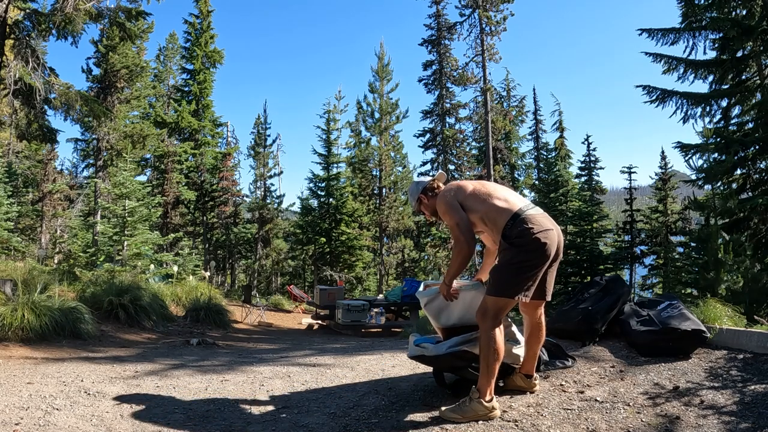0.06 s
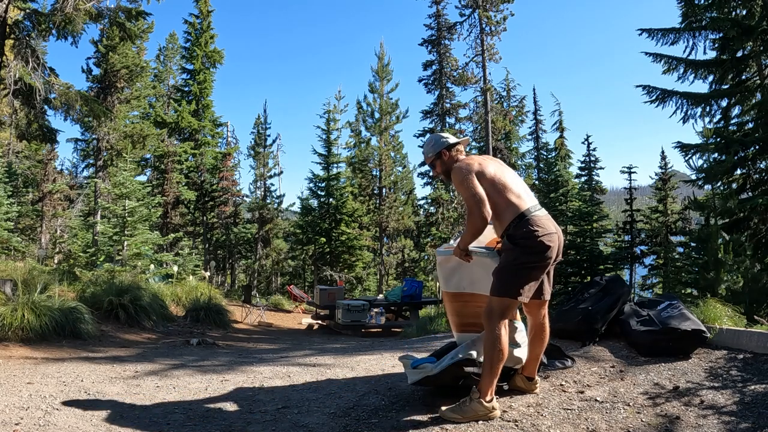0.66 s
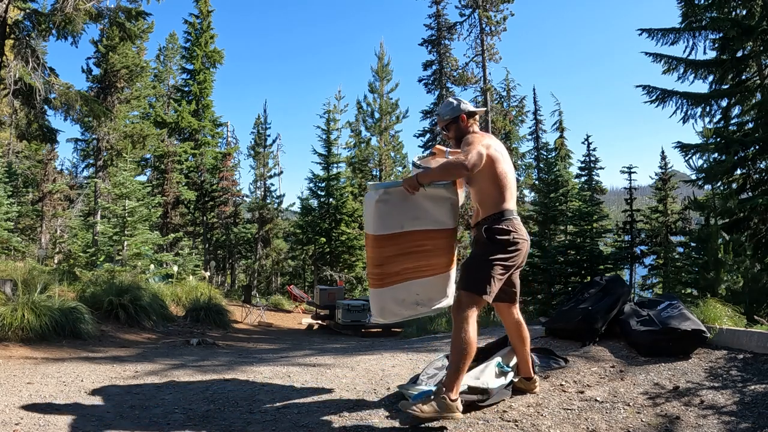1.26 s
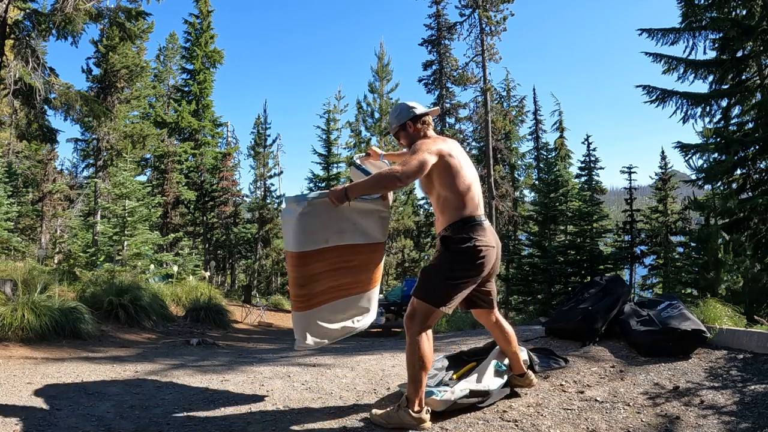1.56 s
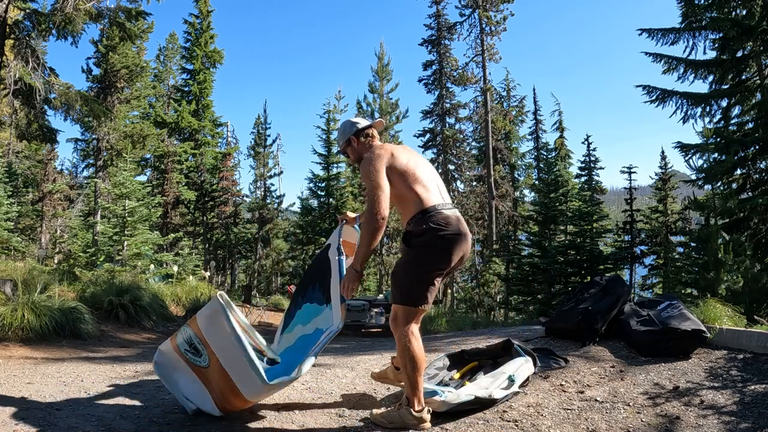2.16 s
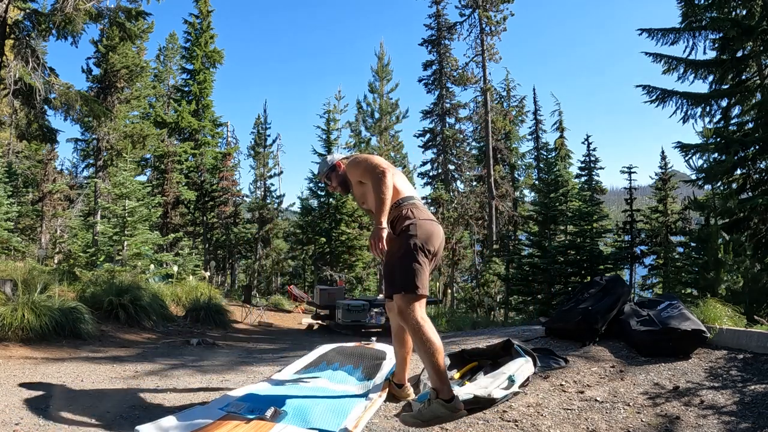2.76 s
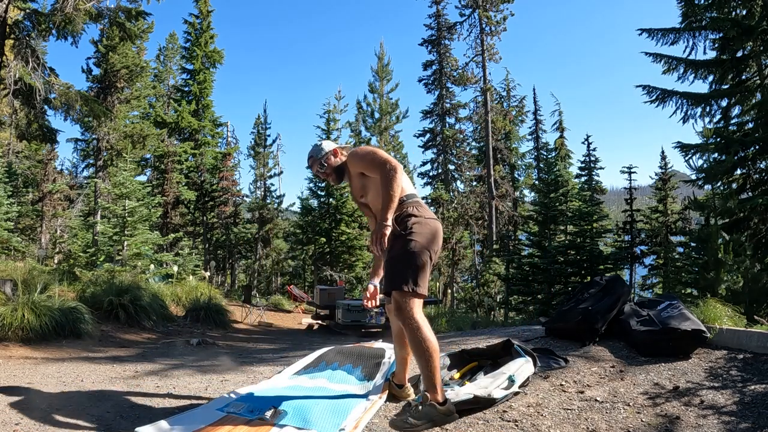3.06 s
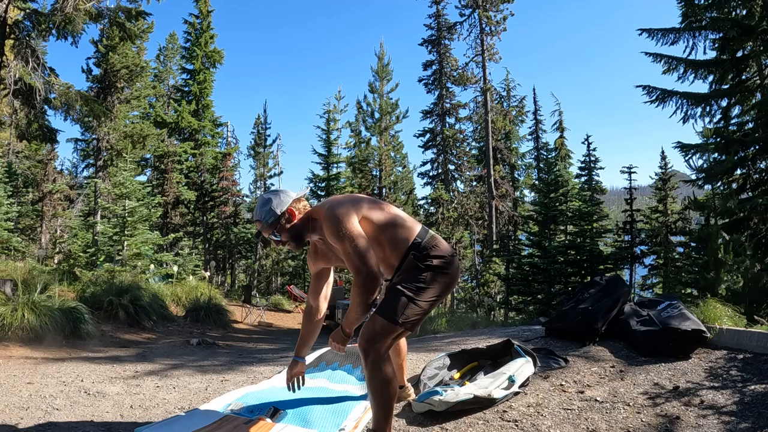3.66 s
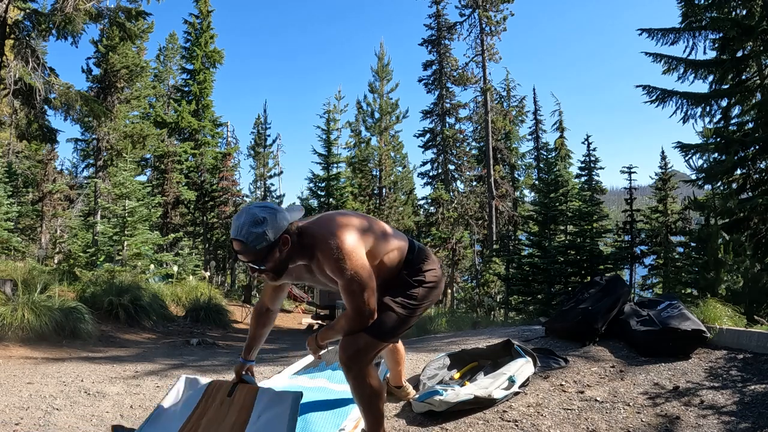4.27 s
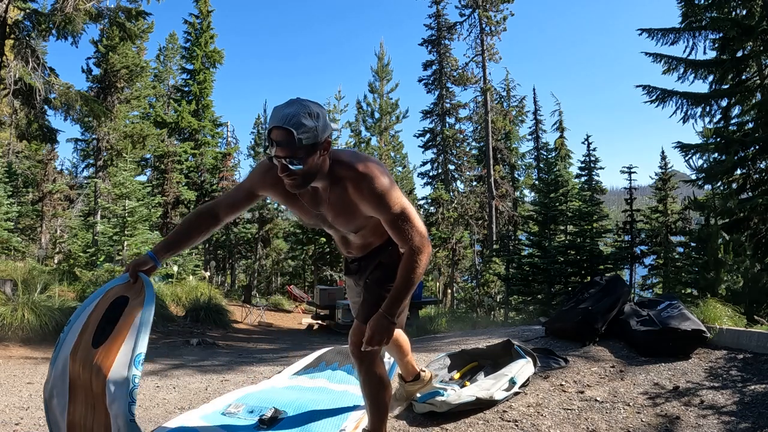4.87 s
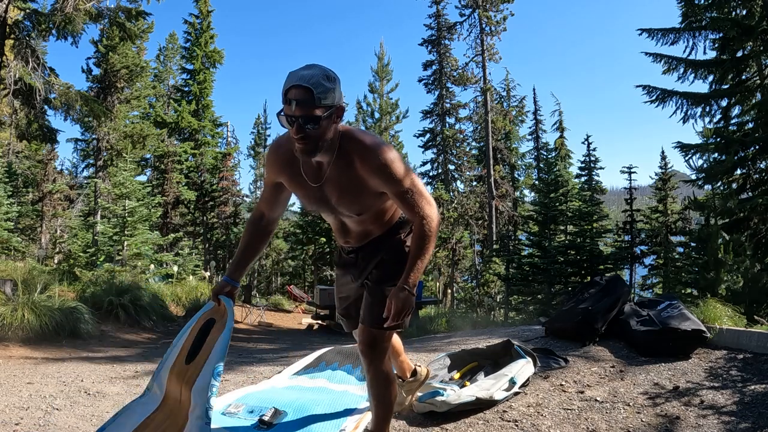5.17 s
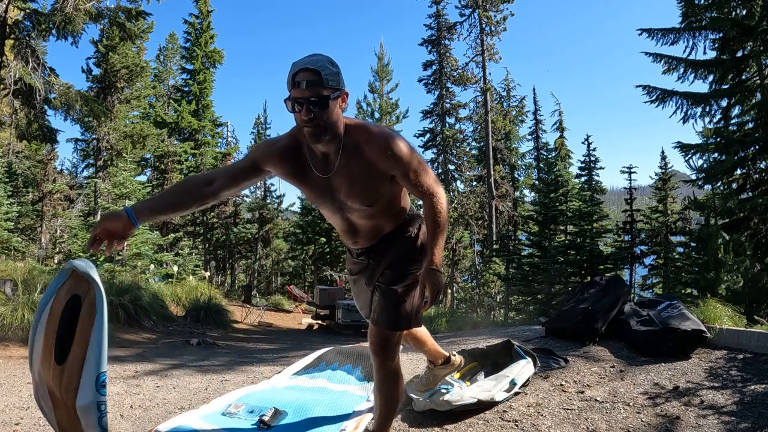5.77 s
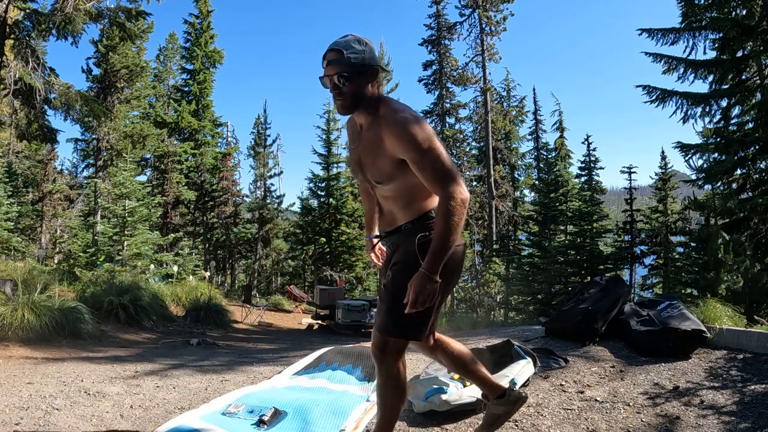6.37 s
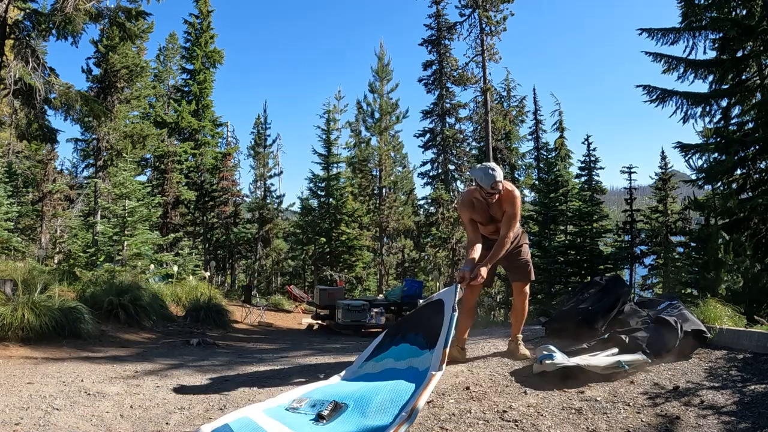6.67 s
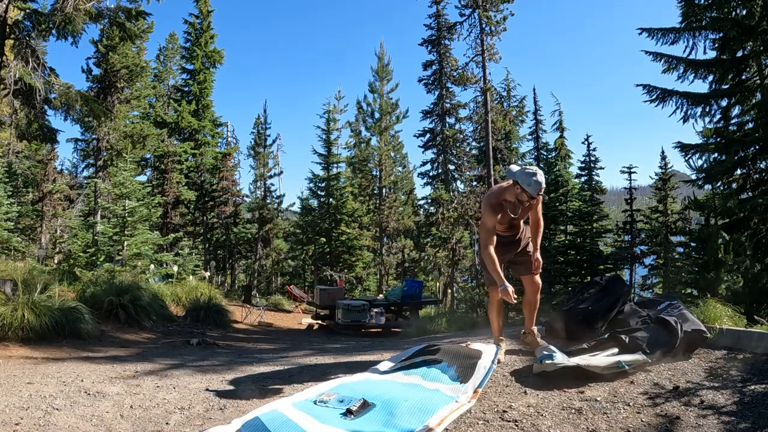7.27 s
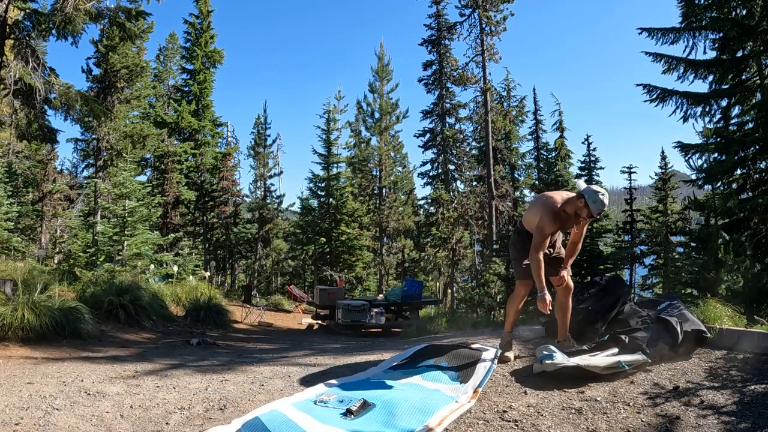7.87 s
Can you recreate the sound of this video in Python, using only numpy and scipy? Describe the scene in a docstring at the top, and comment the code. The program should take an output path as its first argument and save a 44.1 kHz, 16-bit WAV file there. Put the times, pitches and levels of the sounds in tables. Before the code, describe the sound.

A deflated vinyl paddleboard is handled close by on gravel, over faint forest air and a barely audible distant motor. Soft rubbing and a sharp click at 0.6 seconds lead to a loud, hollow slap at 0.9, followed by light knocks and a gritty slide. From 2.1 seconds the sheet snaps, scrapes and flops down fold by fold. The heaviest thump, at 2.6, pushes out a low puff of air and briefly overloads the microphone; smaller ones follow until 3. A knock comes at 3.5, then shoes scuff and pebbles tick. Around 4.8 a brief creak precedes another slap. Lighter knocks and rustling continue to a hard crack and thump near 6.2. From 6.6 to 7.1 the board is dragged over the stones with a rumbling scrape. It thuds down at 7.25, and small scuffs, ticks and a soft bump finish around 8.

```python
"""A deflated paddleboard is pulled from its bag and unrolled on a gravel clearing. Its stiff vinyl
slides, flops down fold by fold on cushions of trapped air and is dragged straight. Friction sounds
as a stream of tiny impacts under the sheet and the scuffing shoes; pebbles and creases tick.
A far motor drones under the still forest air. The hardest slaps overload the microphone."""
import sys
import numpy as np
from scipy import signal
from scipy.fft import rfft, irfft, next_fast_len
from scipy.io import wavfile
from scipy.ndimage import map_coordinates

SR = 44100
rng = np.random.default_rng(int(sys.argv[2]) if len(sys.argv) > 2 else 0)


def generate_wav(sig):
    """Save sig (samples, or channels by samples) to the path in sys.argv[1] as 16-bit PCM at SR."""
    pcm = np.round(np.clip(np.atleast_2d(sig).T, -1, 1) * 32767).astype(np.int16)
    wavfile.write(sys.argv[1], SR, pcm)


N = 358533


def amp(db):
    """Decibels to amplitude ratio."""
    return 10 ** (np.asarray(db) / 20)


def unit(x):
    """Normalisation to rms 1."""
    return x / np.sqrt(np.mean(x ** 2) + 1e-20)


def along(points, hz):
    """Interpolation of (Hz, value) points on a logarithmic frequency axis."""
    f, v = np.transpose(points)
    return np.interp(np.log(hz + 1), np.log(f), v)


def curve(points, outside=None):
    """Linear interpolation of (seconds, value) points at every sample."""
    return np.interp(np.arange(N) / SR, *np.transpose(points), left=outside, right=outside)


def wobble(rate):
    """Smooth random modulation, with rate knots a second."""
    return map_coordinates(rng.standard_normal(int(N * rate / SR) + 4), [np.arange(N) * rate / SR])


def swell(centre, length):
    """Gaussian envelope; length is its width in seconds at 1/e of the peak."""
    return np.exp(-np.minimum((2 * (np.arange(N) / SR - centre) / length) ** 2, 20))


def stroke(start, rise, hold, release):
    """Exponential envelope: it climbs 20 dB over the rise, holds, then loses 20 dB per release time."""
    t = np.arange(N) / SR - start
    decades_down = np.maximum(1 - t / rise, 0) + np.maximum(t - rise - hold, 0) / release
    return amp(-20 * np.minimum(decades_down, 10))


def filtered(x, response):
    """Filtering by multiplication in the frequency domain."""
    n = x.shape[-1]
    m = next_fast_len(n + 4096)
    return irfft(rfft(x, m) * response(np.fft.rfftfreq(m, 1 / SR)), m)[..., :n]


def coloured(x, spectrum, size=4096):
    """Minimum-phase filtering by the given spectrum, normalised to rms 1."""
    cepstrum = irfft(np.log(amp(along(spectrum, np.fft.rfftfreq(size, 1 / SR)))))
    causal = np.r_[1, np.full(size // 2 - 1, 2), 1, np.zeros(size // 2 - 1)]
    impulse_response = irfft(np.exp(rfft(cepstrum * causal)))
    return unit(signal.fftconvolve(x, impulse_response)[:len(x)])


def noise(n, spectrum):
    """Gaussian noise of the given spectrum, at rms 1."""
    return coloured(rng.standard_normal(n), spectrum)


def resonance(x, hz, width_hz):
    """Forced response of one damped mode."""
    return signal.lfilter(*signal.iirpeak(hz, hz / width_hz, fs=SR), x)


def double_resonance(x, hz, width_hz):
    """Two like resonators in cascade, each width_hz wide, normalised to rms 1."""
    return unit(resonance(resonance(x, hz, width_hz), hz, width_hz))


def add(track, start, sound):
    """Superposition of a sound on the track, from start in seconds."""
    part = track[max(round(start * SR), 0):][:len(sound)]
    part += sound[:len(part)]


def grains(rate, spread_db, smooth, life_s=0.0017):
    """Shot noise: brief scrapes of unequal size, rate a second, over a share of smooth friction."""
    energy = (rng.random(N) < rate / SR) / rate
    hit = energy > 0
    energy[hit] *= amp(2 * spread_db * np.minimum(rng.standard_normal(N)[hit], 2))
    energy = signal.lfilter([1], [1, -np.exp(-1 / (life_s * SR))], energy)
    return np.sqrt(energy / energy.mean() + smooth ** 2) * rng.standard_normal(N)


# Spectrum of the forest air. Each row: frequency in Hz, relative level in dB.
AIR_SPECTRUM = [(20, -4.5), (70, -1.5), (130, -12.5), (220, -14), (450, -53.5), (1300, -25), (3000, -46.5),
                (7000, -43), (16000, -73)]

def forest_air():
    """Ambient noise: light air makes a faint, low rush that slowly wavers."""
    return amp(-50.5 + 2.0 * wobble(2)) * noise(N, AIR_SPECTRUM)


# Spectrum of the motor. Each row: frequency in Hz, relative level in dB.
MOTOR_SPECTRUM = [(40, -31.5), (70, -20), (87, 3.5), (130, -29), (172, -2.5), (230, -65)]
# Course of its drone. Each row: time in seconds, mean level in dB.
MOTOR_LEVELS = [(1, -52.5), (3.2, -49), (3.8, -65), (5, -61), (7.5, -49), (8.1, -71)]

def far_motor():
    """Fading over distance: two narrow bands an octave apart come and go with the breeze."""
    return amp(curve(MOTOR_LEVELS) + 2.8 * wobble(0.92)) * noise(N, MOTOR_SPECTRUM)


def tree_echo(x, t60):
    """Reverberation: the trunks around the clearing scatter back a dull, decaying tail."""
    t = np.arange(SR) / SR
    tail = rng.standard_normal((2, SR)) * amp(-60 * t / t60) * (1 - np.exp(-t / .02))
    dull_tail = filtered(tail, lambda hz: amp(along([(200, -15), (1500, 0), (8000, -14)], hz)))
    return signal.fftconvolve(x[None], dull_tail / np.linalg.norm(tail[0]), axes=1)[:, :N]


def bag_chafing():
    """Cavity resonance: the bag rubs on the rolled board, whose hollow hums."""
    hollow = double_resonance(grains(500, spread_db=-1.5, smooth=.6), hz=194, width_hz=150)
    return hollow * amp(-34.5) * stroke(start=0.55, rise=0.18, hold=0.091, release=.1)


# Creaks of the vinyl. Each row: centre in seconds, level in dB, pitch in Hz, length in seconds.
CREASE_CREAKS = [(4.792, -27.5, 1050, 0.045), (5.511, -43.5, 1244, 0.031)]

def vinyl_creaks():
    """Stick-slip friction: vinyl catches on vinyl and drives a stiff, well damped crease."""
    track = np.zeros(N)
    for centre, db, hz, length in CREASE_CREAKS:
        slips = grains(400, spread_db=8.0, smooth=0.3)
        track += amp(db) * swell(centre, length) * double_resonance(slips, hz, width_hz=hz)
    return track


# Puffs of air. Each row: centre in seconds, level in dB, length in seconds.
AIR_PUFFS = [(0.95, -37.5, 0.053), (1.623, -35.5, 0.14), (2.615, -17, 0.068), (2.886, -20.5, 0.049),
             (4.856, -23, 0.038), (5.87, -37.5, 0.08)]

def air_puffs():
    """Air displacement: the broad sheet shoves out low swells of noise as it swings and lands."""
    push = sum(amp(db) * swell(centre, length) for centre, db, length in AIR_PUFFS)
    return push * noise(N, [(20, -1.0), (65, 0.5), (120, -4.0), (250, -27.5), (1000, -85.0)])


# Knocks of the folded board in the hands. Each row: start in seconds, level in dB, pitch in Hz.
ROLL_KNOCKS = [(0.079, -35, 158), (0.343, -34.5, 169.6), (0.378, -35.5, 430), (0.637, -22, 272),
               (1.061, -27, 570), (1.267, -26, 490), (1.443, -33.5, 346), (1.914, -27.5, 480),
               (4.626, -26, 320), (5.211, -30, 432), (5.4, -20, 490), (6.063, -26, 378)]

def hollow_knocks(t60_cycles=12.7):
    """Free vibration: a fold bumps the roll, ringing three damped partials of slightly varied ratio."""
    track, t = np.zeros(N), np.arange(SR // 8) / SR
    for start, db, hz in ROLL_KNOCKS:
        detune = np.exp(rng.standard_normal(2) / 20)
        partials_hz = hz * np.r_[1, np.array([1.6, 2.5]) * detune]
        ring = np.array([1, -.6, .5]) @ np.sin(2 * np.pi * np.outer(partials_hz, t))
        add(track, start, amp(db - 60 * t * hz / t60_cycles) * ring)
    return track


# Slides of the sheet over the ground. Each row: start, rise, hold and release in seconds,
# crunch level in dB, then sheet rumble and sand hiss in dB relative to the crunch.
SHEET_SLIDES = [(0.0, 0.0023, 0.025, 0.63, -56.5, 5, -7.5), (0.49, 0.2, 0.11, 0.32, -41.5, 8, -3.5),
                (0.87, 0.0091, 0.014, 0.52, -40.5, 4.5, -4), (1.485, 0.078, 0.06, 0.27, -30, -3, -11.5),
                (1.95, 0.06, 0.05, 0.036, -46.5, 0, -12.5), (2.13, 0.05, 0.036, 0.078, -23.5, -1.5, -6.5),
                (2.24, 0.12, 0.045, 0.058, -29.5, 4, -11.5), (2.43, .14, 0.06, 0.033, -23.5, 2.5, -13),
                (2.64, 0.031, 0.031, 0.23, -42.5, 5, -9.5), (2.77, 0.022, 0.016, 0.083, -37, 1.5, -17),
                (2.855, 0.0093, 0.029, 0.12, -39, 8.5, -14.5), (4.33, 0.34, 0.078, 0.33, -36, -1.5, -10),
                (5.04, 0.023, 0.044, 0.072, -38, 6, -7.5), (5.12, 0.059, 0.23, 0.25, -49, 2.5, -8.5),
                (5.6, 0.28, 0.014, 0.17, -44, 4, -8.5), (5.94, 0.085, 0.021, 0.75, -39.5, 4.5, -15),
                (6.15, 0.038, .02, 0.096, -30, 11, -17.5), (6.54, 0.21, 0.29, 0.23, -31.5, 3, -13.5),
                (6.885, .025, .015, .08, -26, -3, -17), (7.19, 0.057, 0.022, 0.12, -44, 12.5, -13),
                (7.73, 0.056, 0.014, 0.093, -43.5, 4.5, -13), (7.9, 0.052, 0.01, 0.21, -50.5, 7, -11)]
# Turns of a shoe in the grit. Each row: start and hold in seconds, crunch level in dB,
# sand hiss in dB relative to the crunch.
SHOE_SCUFFS = [(0.306, 0.068, -49, -9), (1.04, 0.26, -52, -5.5), (3.496, 0.031, -30, -13),
               (3.762, 0.18, -47, -11.5), (4.024, 0.18, -50, -12.5), (4.227, .12, -44, -13),
               (4.3, 0.063, -40, -18), (5.824, 0.024, -41, -11), (6.223, 0.054, -46.5, 2.5),
               (6.38, 0.13, -47.5, -4.5), (6.566, 0.013, -31.5, -19), (7.84, .02, -45, -17)]

def friction_levels():
    """Incoherent addition: slides and scuffs sum in power to drive rumble, crunch and hiss, in dB."""
    rest_db = -72.5  # grit settling between movements
    scuff_rise_s, scuff_release_s, sole_db = 0.018, 0.13, -9.5  # a sole drums less than the sheet
    scuffs = [(start, scuff_rise_s, hold, scuff_release_s, db, sole_db, sand_db)
              for start, hold, db, sand_db in SHOE_SCUFFS]
    power = np.outer(amp([rest_db, rest_db, rest_db - 10]) ** 2, np.ones(N))
    for *timing, db, sheet_db, sand_db in list(SHEET_SLIDES) + scuffs:
        power += np.outer(amp([db + sheet_db, db, db + sand_db]) ** 2, stroke(*timing) ** 2)
    return 10 * np.log10(power)


# Spectra of sheet rumble, gravel crunch and sand hiss. Each row: frequency in Hz, relative level in dB.
SHEET_SPECTRUM = [(30, -31), (100, -5), (150, 0), (220, 1.5), (300, -0.5), (460, 2), (750, -6), (1200, -8),
                  (3000, -80.5)]
CRUNCH_SPECTRUM = [(200, -35.5), (500, 1), (900, 1.5), (1500, 3), (2300, -2.5), (3400, -7), (5500, -13),
                   (10000, -55)]
SAND_SPECTRUM = [(1000, -45.5), (3000, 5.5), (4500, 3), (7000, -2.5), (10800, -20.5), (12500, -21),
                 (15500, -55)]

def gravel_friction(hard_drag_db=-30):
    """Granular friction: stones catch and slip, drum on the sheet, crunch together and stir the sand."""
    sheet_db, crunch_db, sand_db = friction_levels()
    # A light touch jerks single stones; a hard drag moves a dense, even stream.
    force = amp(crunch_db - hard_drag_db)
    catch = wobble(60) / (1 + force)
    stones_per_s = 65 + 500 * force ** 1.2
    smooth = .46 + .22 * np.minimum(force, 1)
    # Big stones knock low, small ones click high; the sheet moves more big ones than a shoe does.
    contacts = {hz: grains(stones_per_s, spread_db=4.5, smooth=smooth) for hz in (900, 1600, 2900)}
    big, medium, small = (resonance(hits, hz, 1.54 * hz) for hz, hits in contacts.items())
    stones = big * amp(np.minimum(sheet_db - crunch_db, 0)) + medium + small
    drumming = grains(stones_per_s, spread_db=2.5, smooth=0.48, life_s=0.0031)
    grit = grains(2 * stones_per_s, spread_db=9.5, smooth=0.95, life_s=0.00031)
    rumble = amp(sheet_db + 1.7 * catch) * coloured(drumming, SHEET_SPECTRUM)
    crunch = amp(crunch_db + 3.8 * catch) * coloured(stones, CRUNCH_SPECTRUM)
    hiss = amp(sand_db + catch + 2.0) * coloured(sum(contacts.values()) + 2 * grit, SAND_SPECTRUM)
    return rumble + crunch + hiss


# Spectrum of a tick's crack. Each row: frequency in Hz, relative level in dB.
CRACK_SPECTRUM = [(500, -29), (2500, 1.5), (7500, -2.5), (10500, -20.5), (13000, -24.5), (16000, -38.5)]
# Ticks of pebbles and creases. Each row: start in seconds, level in dB, pitch in Hz,
# relative level of the crack in dB.
SNAP_TICKS = [(0.634, -14, 1320, -22), (1.059, -23.5, 1200, -12), (1.156, -31, 945, 0.5),
              (1.319, -31.5, 2000, -25), (1.44, -28, 920, -11), (1.896, -38, 1110, 1.5),
              (2.139, -11.5, 1150, -8.5), (2.161, -16.5, 1094, -4), (3.481, -27, 1190, -19),
              (3.519, -15.5, 1100, -9.5), (3.598, -23, 1280, -29), (3.866, -26.5, 1700, -31),
              (4.112, -30.5, 1190, -8), (4.225, -19, 1690, -32), (4.247, -29, 2610, -20),
              (4.254, -22.5, 1460, -25), (4.32, -21.5, 1800, -24), (4.345, -10.5, 1260, -34),
              (4.409, -17.5, 1390, -25), (4.616, -19.5, 1350, -12), (4.685, -14.5, 800, -28),
              (4.769, -25.5, 1200, -3.5), (5.061, -27.5, 1357, -8), (5.267, -33.5, 1500, -4.5),
              (5.844, -21.5, 1360, -19), (6.062, -26.5, 860, -1), (6.12, -22, 1310, -15),
              (6.258, -25, 1800, -3.5), (6.278, -30, 1230, -6), (6.338, -25, 1970, -7.5),
              (6.494, -25.5, 1700, -17), (6.547, -18, 1380, -14.5), (6.594, -12, 1340, -30),
              (6.628, -14.5, 1020, -40), (7.726, -25, 1690, -41), (7.872, -23, 1260, -24),
              (8.044, -34.5, 1630, -2)]

def snapping_ticks(t60_cycles=10):
    """Impulse response: a pebble or crease lets go, with a crack and a dead ring set by its shape."""
    track, t = np.zeros(N), np.arange(SR // 16) / SR
    shapes = np.exp(rng.standard_normal(len(SNAP_TICKS)) / 10)
    crack_decay = amp(-60 * t / 0.009) + 0.2 * amp(-60 * t / 0.039)
    for (start, db, hz, crack_db), shape in zip(SNAP_TICKS, shapes):
        phase = 2 * np.pi * hz * t
        modes = np.sin(phase) - .55 * np.sin(1.9 * shape * phase) - .35 * np.sin(.6 * phase)
        ring = modes * amp(-60 * hz * t / t60_cycles)
        crack = noise(len(t), np.array(CRACK_SPECTRUM) * [shape, 1]) * crack_decay
        crumbs = noise(len(t), CRUNCH_SPECTRUM) * amp(-60 * t / 0.029)
        add(track, start, amp(db) * (0.92 * ring + amp(crack_db) * crack + 0.097 * crumbs))
    return track


# The long drag that pulls the board straight. Each row: time in seconds, level in dB.
DRAG_LEVELS = [(6.6, -47), (6.67, -24), (6.75, -21.5), (6.87, -24.5), (6.915, -17), (6.96, -22),
               (7.06, -25), (7.16, -51)]
# Modes of the outstretched sheet. Each row: frequency in Hz, resonator width in Hz, relative level in dB.
SHEET_MODES = [(249, 117, -2), (462, 335, -1), (890, 610, -5.5)]

def long_drag():
    """Forced vibration: a dense stream of stones drums on the sheet, whose modes drift with tension."""
    force = amp(curve(DRAG_LEVELS, outside=-np.inf))
    drum = sum(amp(db) * double_resonance(grains(500, spread_db=0.5, smooth=0.7), hz, width_hz)
               for hz, width_hz, db in SHEET_MODES)
    pitch_ratio = np.exp(wobble(10) / 20)
    return force * unit(map_coordinates(drum, [np.cumsum(pitch_ratio)], mode="wrap"))


# Modes of the board's stiff nose. Each row: frequency in Hz, level in dB, 60 dB decay time in seconds.
NOSE_MODES = [(238, -2.5, 0.044), (402, -3, 0.053), (581, -5.5, 0.049), (1460, -4.5, 0.0074),
              (2240, -6, 0.0052), (5050, -10, 0.0032)]

def nose_drop(start=6.1405):
    """Modal superposition: the nose drops flat, giving a low thump under a short, hard crack."""
    track, t = np.zeros(N), np.arange(SR // 8) / SR
    for k, (hz, db, t60) in enumerate(NOSE_MODES):
        add(track, start, (-1) ** k * amp(db - 60 * t / t60) * np.sin(2 * np.pi * hz * t))
    return track


# Spectrum of vinyl slapping gravel. Each row: frequency in Hz, relative level in dB.
SLAP_SPECTRUM = [(30, -0.5), (120, 8), (450, 0), (1300, 1), (2500, -10.5), (6000, -21.5), (15500, -53.5)]
# Folds landing. Each row: start in seconds, thump level in dB, settled pitch in Hz, slap level in dB.
FOLD_LANDINGS = [(0.902, -7.5, 518, -17), (0.916, -4.5, 548, -11.5), (2.139, -12, 160, -32),
                 (2.172, -17, 620, -12), (2.275, -19.5, 223, -30), (2.344, -15, 337, -21.5),
                 (2.574, -4.5, 118, -3.5), (2.588, 3, 188.6, -5), (2.624, -8.5, 159, -8.5),
                 (2.643, -11.5, 222, -14.5), (2.859, -9, 162.6, -15.5), (2.868, -3.5, 280, -24.5),
                 (2.970, -12, 231, -34.5), (3.118, -29.5, 242, -72), (3.5515, -10, 632, -20),
                 (4.050, -21.5, 220.5, -43), (4.130, -27.5, 190, -37), (4.8416, -8.5, 197, -12.5),
                 (4.847, -10, 387, -16), (4.909, -25.5, 131.5, -59), (6.017, -15, 281, -24.5),
                 (6.169, -5, 177, -17.5), (6.831, -5.5, 404, -19.5), (7.209, -24.5, 168, -25.5),
                 (7.251, -5.5, 264, -23.5), (7.256, -7.5, 160.6, -19), (7.316, -22.5, 259, -47),
                 (7.986, -21.5, 292, -32)]

def fold_flops():
    """Air spring: each fold traps a cushion that thumps, while the skin slaps the gravel."""
    track, t = np.zeros(N), np.arange(SR // 4) / SR
    build_cycles, t60_cycles = .25, 9.8  # counted in cycles, so big low folds last longer
    escaping_air = 0.16  # one low push
    pitch_sag = 1 + 0.36 * np.exp(-t / 0.0042)  # the cushion starts tight and high
    slap_envelope = (1 - np.exp(-t / 0.00059)) * (amp(-60 * t / 0.055) + 0.092 * amp(-60 * t / 0.18))
    for start, thump_db, hz, slap_db in FOLD_LANDINGS:
        phase = 2 * np.pi * hz * np.cumsum(pitch_sag) / SR
        cushion = 1.38 * np.sin(phase) + 0.5 * np.sin(1.806 * phase) + escaping_air
        build_up = (1 - np.exp(-t * hz / build_cycles)) ** 2
        thump = cushion * build_up * amp(-60 * t * hz / t60_cycles)
        slap = noise(len(t), SLAP_SPECTRUM) * slap_envelope
        add(track, start, amp(slap_db) * slap - amp(thump_db) * thump)
    return track


# Likeness of the two channels. Each row: frequency in Hz, left-right correlation from 0 to 1.
STEREO_CORRELATION = [(60, .98), (150, .998), (500, .975), (1400, .94), (7000, .86), (14000, .35)]

def widened(x):
    """Decorrelation: scattered sources reach the two microphone ports differently, most in the treble."""
    def quadrature(hz):
        correlation = np.clip(along(STEREO_CORRELATION, hz), 0, 1)
        return 1j * np.tan(np.arccos(correlation) / 2)
    side = filtered(x * unit(wobble(66)), quadrature)
    return np.array([x + side, x - side])


# Where the board is handled. Each row: time in seconds, left minus right level in dB.
BOARD_PAN = [(0, -2.2), (1.7, -2.2), (2.2, -.1), (2.8, -.3), (3.6, -1.8), (4.3, -1.7), (4.8, -.1),
             (5.7, -.2), (6.2, 1.1), (6.9, .2), (8.1, -2)]

def scene():
    """Superposition: the moving board, its faint echo, and the background a little to the right."""
    board = gravel_friction() + long_drag() + bag_chafing() + fold_flops() + nose_drop()
    board = board + hollow_knocks() + air_puffs() + vinyl_creaks() + snapping_ticks()
    echo = amp(-20.0) * tree_echo(board, t60=0.48)
    pan_db = curve(BOARD_PAN)
    direct = widened(board) * amp([pan_db / 2, -pan_db / 2])
    background = widened(forest_air() + far_motor()) * amp([[-.5], [.5]])
    return direct + echo + background


# Imbalance of the microphone ports. Each row: frequency in Hz, left minus right level in dB.
PORT_IMBALANCE = [(1000, -.3), (4000, .9), (8000, 2.4), (12500, 6)]

def record(dry):
    """Saturation: after the unequal ports, peaks clip at full scale and the treble rolls off."""
    limit_hz = 15750
    at_ports = filtered(dry, lambda hz: amp(along(PORT_IMBALANCE, hz) * np.array([[.5], [-.5]])))
    clipped = np.clip(at_ports, -1, 1)
    return filtered(clipped, lambda hz: amp(along([(12800, 0), (limit_hz, -16)], hz)) * (hz < limit_hz))


dry = scene()
out = record(dry)
generate_wav(out)
```